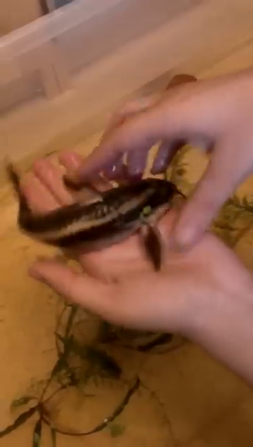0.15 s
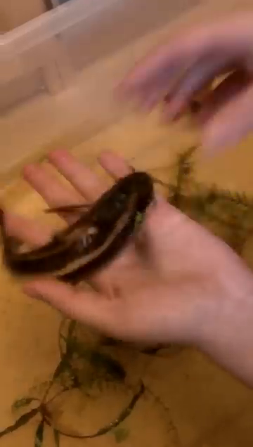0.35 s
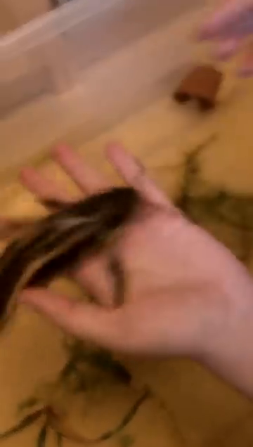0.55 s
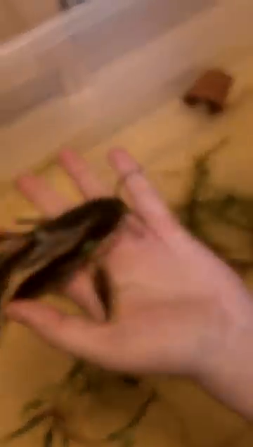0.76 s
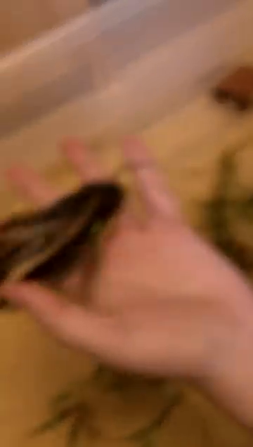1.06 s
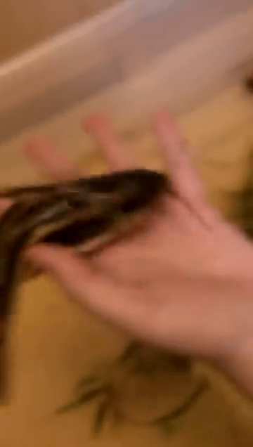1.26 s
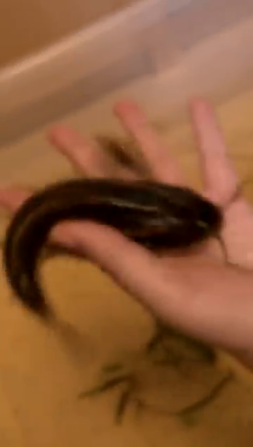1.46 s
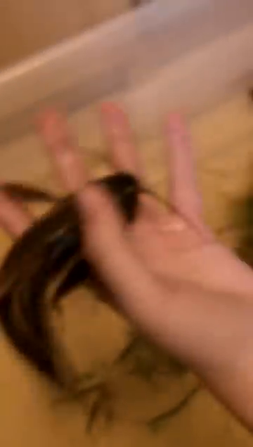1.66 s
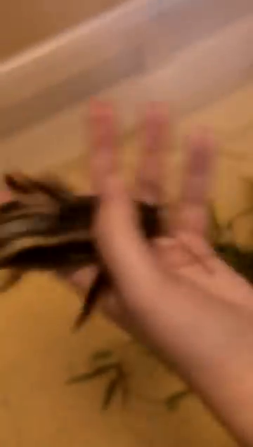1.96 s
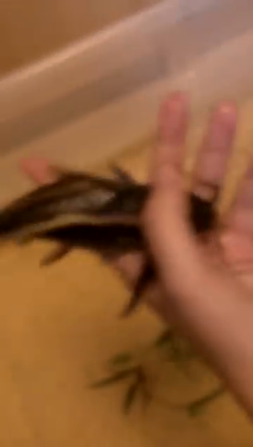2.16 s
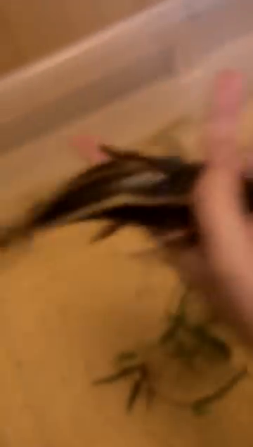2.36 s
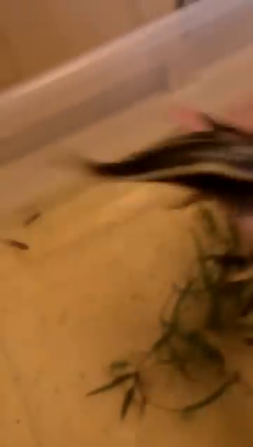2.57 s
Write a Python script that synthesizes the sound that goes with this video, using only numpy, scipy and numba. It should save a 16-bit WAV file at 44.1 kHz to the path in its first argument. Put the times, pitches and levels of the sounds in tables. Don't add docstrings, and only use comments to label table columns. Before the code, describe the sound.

After about 0.2 s of near silence, a held catfish rasps in short, ratchet-like croaks, each a rapid train of gritty clicks. Strong bursts come near 0.25, 0.4, 0.75, 1.0 and 1.25 s, with weaker scrapes between. From 1.35 s the croaks turn hollow and shifting in pitch, with a sharp crack near 1.65 s. More follow at 1.9, 2.05 and 2.35 s, then a faint scrape around 2.5 s. Close, small room, faint hiss.

```python
import sys
import numpy as np
from scipy import signal
from scipy.fft import rfft, irfft
from scipy.io import wavfile
from scipy.ndimage import uniform_filter1d
from numba import njit

SR = 44100
rng = np.random.default_rng(int(sys.argv[2]) if len(sys.argv) > 2 else 0)


def decibels_to_gain(level_db):
    exponent = np.asarray(level_db, float) / 20
    return 10 ** exponent


def wav_record(signal):
    frames = np.transpose(np.atleast_2d(signal))
    bounded = np.clip(frames, -1, 1)
    quanta = np.round(bounded * 32767).astype(np.int16)
    wavfile.write(sys.argv[1], SR, quanta)


N = 119070

# frequency_hz, level_db
HISS_SPECTRUM = [
    (30, -14),
    (100, -13.5),
    (350, 0.5),
    (800, -6.5),
    (1500, -10.5),
    (5000, -13.5),
    (7500, -11),
    (16000, -12.5),
]
HISS_DB, HISS_SWAY_DB = -69, -1.16

# start_s, level_db, pitch_hz
WET_TICKS = [(.2124, -60, 6200), (0.316, -52.5, 8050), (.9284, -49.5, 8000), (1.2371, -47.5, 6370),
             (1.8519, -53, 7000), (2.4657, -54, 7440), (2.618, -55, 5100), (2.671, -61, 7300),
             (1.694, -50.5, 6500), (1.75, -59, 9000), (2.309, -59, 5500), (2.569, -52.5, 8000)]
TICK_FALL_S, TICK_NOISE = 0.0011, 0.86

# start_s, level_db
RIDGE_SLIPS = [(0.2368, -24), (0.25, -19.5), (0.262, -18.5), (0.2652, -26), (0.2702, -20.5),
               (0.2753, -21.5), (0.28, -30), (0.2865, -37), (0.3837, -28.5), (0.396, -24), (0.4087, -22.5),
               (0.4227, -23.5), (0.4373, -23), (0.4479, -22), (0.4567, -24), (0.4627, -32.5), (0.4668, -39),
               (0.471, -47), (0.5138, -25.5), (0.532, -24.5), (0.5945, -40.5), (0.6002, -44.0),
               (0.6054, -38), (0.612, -37), (0.6317, -38), (0.723, -26), (0.7402, -23.5), (0.7551, -23),
               (0.7677, -25.0), (0.7791, -30.5), (0.7888, -41), (0.8207, -46.5), (0.8413, -30),
               (0.8524, -32.5), (0.893, -35.5), (0.9021, -41.5), (0.993, -24.5), (1.0091, -22.5),
               (1.0232, -19.5), (1.0372, -20.5), (1.0472, -22.5), (1.0561, -35.5), (1.062, -42),
               (1.0947, -43), (1.1, -39.5), (1.1118, -33.5), (1.1262, -30.5), (1.138, -36.5), (1.1521, -38),
               (1.175, -38),
               (1.2519, -26), (1.2674, -23.5), (1.2801, -23), (1.2945, -22), (1.3084, -22),
                (1.3185, -24.5), (1.3571, -33.5), (1.3701, -30.0), (1.38, -29), (1.3892, -26.5),
                (1.4007, -24.5), (1.4136, -23), (1.425, -22.5), (1.4339, -26.5), (1.4813, -32.5),
                (1.4956, -28), (1.5095, -27), (1.5231, -24.0), (1.5384, -24), (1.552, -23), (1.5623, -25.5),
                (1.569, -27.5), (1.5744, -30.5), (1.5806, -42.5), (1.6065, -30.0), (1.6183, -26),
                (1.6304, -27.5), (1.6483, -15), (1.6664, -24), (1.6757, -34.5), (1.7632, -45.5),
                (1.7743, -38.5), (1.7858, -35), (1.797, -36), (1.8063, -38.5),
               (1.8843, -33.5), (1.8938, -30.5), (1.9061, -29), (1.9179, -29), (1.9288, -23.5),
              (1.9361, -22.5), (1.9422, -23.5), (1.9491, -26.5), (1.956, -22.5), (1.964, -23.5),
              (1.9738, -24.0), (1.9845, -29.5), (2.0328, -29.5), (2.0435, -28), (2.0543, -26.5),
              (2.066, -24), (2.079, -25), (2.0948, -23.5), (2.1072, -24), (2.1155, -28), (2.1215, -37.5),
              (2.1627, -40.5), (2.1708, -39), (2.1762, -39), (2.1834, -39.5), (2.1926, -42.5),
              (2.202, -38.5), (2.2103, -40.0), (2.2215, -40), (2.233, -47), (2.33, -32.5), (2.3411, -30.5),
              (2.351, -28), (2.3624, -27), (2.3738, -28.5), (2.3885, -24.5), (2.3983, -26), (2.4059, -30.5),
              (2.4839, -46), (2.491, -40.5), (2.4964, -39.5), (2.5021, -40), (2.5102, -40.5),
              (2.5212, -37.0), (2.5294, -39), (2.5376, -42), (2.5472, -45.5), (2.5628, -47.5)]
SLIP_RISE_MS, SLIP_FALL_MS, SLIP_ROUGH = 0.73, 1.0, 0.61
GRIND_RISE_MS, GRIND_FALL_MS = 1.8, 9.17

# start_s, level_db
CREEP = [
    (.36, -61.5),
    (0.488, -61.5),
    (.805, -66),
    (0.867, -70),
    (1.333, -64.5),
    (1.456, -72),
    (1.742, -81),
    (2.005, -68),
    (2.142, -73),
    (2.467, -74),
]
CREEP_S = 0.031

# start_s, bladder_db, skull_db, edge_db, grinding_db
GRIP = [(.2, -19.5, -13.5, -1, -7), (.36, -8, -3.5, 6.5, -4.5), (0.489, -5, 1, 9, 0.5),
        (.58, -26, -16, 7.5, -1.5), (.7, -4.5, 0.5, 3, -5.5), (.81, 1, 2, 6, -6.5),
        (0.969, -2, -3, 1.5, -2.5), (1.085, 2, -1, 4.5, 0), (1.23, -2, 2, 3.5, -3),
        (1.345, -3, -9, 6.5, -7), (1.47, 2, -4, 4, -4), (1.6, -5, 0.5, 2, -3.5),
        (1.642, -18, -9.5, -4.5, -6), (1.75, -8.5, -18.5, 6.5, 2.5), (1.87, 1, -13, 2.5, -5.5),
        (1.926, -10.5, -28, 0, -7), (2.02, 4.5, -6.5, 3, -6), (2.15, -3, -7.5, 7.5, -6),
        (2.32, 4.5, -9, 6, -5.5), (2.475, 0.5, -9, 8, -3.5)]
# girdle_db, crisp_share (0-1)
SOCKET_FACE = [(-5, 0.48), (-4.5, 0.8), (2, 0.36), (-1.5, 0.9), (-1.5, 0.41), (2, 0.4), (-2, 0.69),
               (5.5, .75), (1.5, 0.4), (4, 0.2), (7, 0.4), (6, 0.7), (-4, 0), (0, 0.7), (2, 0.4),
               (1.5, 0.4), (3, 0.5), (5.5, 0.63), (5.5, 0.76), (8, 0.7)]
# chirp_db, chirp_hz, chirp_peak_ms, shaft_db, jaw_db
SPINE_TONE = [(0.5, 4780, 1.05, -1, -19.5), (-2, 5610, 0.87, -3, 1.5), (-3.5, 6000, 1.58, -4, -8),
              (-4, 4300, 1.27, 2, -9), (1, 5000, 1.8, -4.5, -18), (-2, 5250, 1.6, -7.5, -2.5),
              (0, 5170, 1.7, -9.5, -9), (-2, 4700, 2, -5.5, 2), (-1, 5300, 1.6, -7, -2.5),
              (0, 4700, 1.1, -3, 7), (1.5, 4370, 1.2, -6, 5.5), (4, 4460, 1.6, -6, 2.5),
              (3, 5400, 1.77, -7, -4), (3, 5650, 0.56, -4, -5.5), (-3, 5100, 1.2, -5, 8),
              (-1, 5470, 0.62, -4.5, -1), (-2, 5500, 1.17, -1.5, 11), (-7, 7300, 0.82, -2, 6.5),
              (-4.5, 5160, 1.22, -2.5, 12), (-9, 5500, 1.08, -3.5, 11)]
CHIRP_DB, CHIRP_FALL_HZ_PER_MS, CHIRP_SHARP, CHIRP_SCATTER = -6, 420, 2.74, 0.041

# frequency_hz, width_hz, level_db, lag_ms
SPINE = [
    (5150, 970, 3.5, .5),
    (6140, 670, -2, .3),
]
# frequency_hz, width_hz, level_db, lag_ms
BLADDER = [
    (306, 390, -28, 0.061),
    (699.4, 220, -6, 0.36),
]
# frequency_hz, width_hz, level_db, lag_ms
SKULL = [
    (1540, 238, -2.35, 1.483),
]
# frequency_hz, width_hz, level_db, lag_ms
GIRDLE = [
    (2199, 486, -3, 1.0644),
    (3250, 1320, 3.5, 1.187),
    (4300, 550, -1, 1.3),
]
# frequency_hz, width_hz, level_db, lag_ms
EDGE = [
    (7300, 6000, -7, .3),
    (9730, 1900, -24, .1),
    (15300, 7000, -30, 0.03),
]
# frequency_hz, width_hz, level_db, lag_ms
JAW = (1225.5, 299.5, -11.5, 0.45)
EDGE_CRISP, BONE_CRISP = .08, 0.56

# time_s, pitch_hz, level_db
HOLLOW = [(.25, 4360, -3.5), (.275, 4980, 4), (.3, 4700, 10), (.4, 2710, -6), (1.329, 2560, -4.5),
          (1.359, 3850, 12), (1.385, 3610, 11), (1.417, 3070, 13.5), (1.446, 3440, 5), (1.484, 4160, 16),
          (1.511, 2860, 14), (1.543, 2440, 15), (1.575, 2260, 11.5), (1.618, 2270, 4.5), (1.659, 3150, -20),
          (1.765, 3900, 11.5), (1.81, 4200, 8.5), (1.85, 4300, -5), (1.885, 4500, 11.5), (1.92, 4360, 8.5),
          (1.959, 4110, 10), (1.989, 3280, 7), (2.036, 3270, 14.5), (2.056, 3050, 5), (2.068, 2830, 10),
          (2.085, 2960, 5), (2.12, 3360, -18)]
HOLLOW_WIDTH_HZ, HOLLOW_DB, HOLLOW_LAG_MS = 245, -1, 1.913
HOLLOW_WIDE_HZ, HOLLOW_WIDE_DB, HOLLOW_WIDE_LAG_MS = 700, -6.5, 0.906
HOLLOW_DIP, HOLLOW_DIP_MS, HOLLOW_SCATTER, HOLLOW_GRIND = 0.097, 2.03, 0.014, 0.41
FISH_DB, FISH_LOW_HZ = 22, 200

BUBBLE_S, BUBBLE_LENGTH_S, BUBBLE_HZ, BUBBLE_DB = 1.795, .044, 658, -60.5
TUB_T60_S, TUB_DB, TUB_HZ, ROOM_T60_S, ROOM_DB = 0.073, -16, 4700, 0.35, -25
TOP_HZ = 16250


@njit
def svf(x, hz, width):
    y, band, low = np.empty(len(x)), 0., 0.
    for i in range(len(x)):
        g, k = np.tan(np.pi * hz[i] / SR), width / hz[i]
        v = (band + g * (x[i] - low)) / (1 + g * (g + k))
        band, low, y[i] = 2 * v - band, low + 2 * g * v, k * v
    return y


def ring(x, hz, width, db, lag_ms):
    hz = hz + np.zeros(N)
    y = svf(svf(x, hz, 1. * width), hz, 2. * width)
    return np.roll(y, int(lag_ms * SR / 1000)) * decibels_to_gain(db) * np.sqrt(SR / width)


def body(x, modes):
    return sum((-1) ** k * ring(x, *mode) for k, mode in enumerate(modes))


def shape(rise_ms, fall_ms):
    ms = np.arange(SR // 8) * 1000 / SR
    e = (1 - np.exp(-ms / rise_ms)) * np.exp(-ms / fall_ms)
    return e / np.sqrt(np.sum(e ** 2))


def conv(x, h):
    return signal.fftconvolve(x, h)[:N]


def hiss():
    f, pts = np.fft.rfftfreq(N, 1 / SR) + 1, np.array(HISS_SPECTRUM)
    gain = decibels_to_gain(np.interp(np.log(f), np.log(pts[:, 0]), pts[:, 1]))
    x = irfft(rfft(rng.standard_normal(N)) * gain, N)
    hold = SR // 15
    sway = np.repeat(rng.standard_normal(N // hold + 1), hold)
    sway = uniform_filter1d(sway, hold)[:N]
    return x / np.std(x) * decibels_to_gain(HISS_DB + HISS_SWAY_DB * sway)


def ticks():
    out, t = np.zeros(N + SR), np.arange(SR // 200) / SR
    for start_s, db, hz in WET_TICKS:
        k = int(start_s * SR)
        snap = np.sin(2 * np.pi * hz * t) + TICK_NOISE * rng.standard_normal(len(t))
        out[k:k + len(t)] += decibels_to_gain(db) * np.exp(-t / TICK_FALL_S) * snap
    return out[:N]


def slips():
    x, rows = np.zeros(N), np.array(RIDGE_SLIPS)
    x[(rows[:, 0] * SR).astype(int)] = decibels_to_gain(rows[:, 1])
    return x


def grinding(clicks, level):
    t = np.arange(N) / SR
    creep = sum(decibels_to_gain(db) * np.sin(np.pi * np.clip((t - s) / CREEP_S, 0, 1) ** 2) for s, db in CREEP)
    rub = np.abs(conv(clicks, shape(GRIND_RISE_MS, GRIND_FALL_MS)))
    return (rub * level + creep) * rng.laplace(size=N) / 2


def chirps(clicks, stroke):
    at, ms, out = np.flatnonzero(clicks), np.arange(SR // 100) * 1000 / SR, np.zeros(N + SR)
    db, hz, peak_ms = np.array(SPINE_TONE)[stroke[at], :3].T[:, :, None]
    pitch_luck, phase = rng.standard_normal((len(at), 2)).T[:, :, None]
    swell = (ms / peak_ms * np.exp(1 - ms / peak_ms)) ** CHIRP_SHARP
    pitch = hz * (1 + CHIRP_SCATTER * pitch_luck) - CHIRP_FALL_HZ_PER_MS * (ms - peak_ms)
    pitch = np.clip(pitch, hz / 2, None)
    tone = swell * np.sin(2 * np.pi * np.cumsum(pitch, axis=1) / SR + phase) / np.sqrt(peak_ms)
    np.add.at(out, at[:, None] + np.arange(len(ms)), clicks[at, None] * decibels_to_gain(db + CHIRP_DB) * tone)
    return out[:N]


def hand_hollow(clicks, fresh, grind):
    t, (at_s, at_hz, at_db) = np.arange(N) / SR, np.array(HOLLOW).T
    blow = (clicks + .5 * fresh + HOLLOW_GRIND * grind) * decibels_to_gain(np.interp(t, at_s, at_db))
    twitch = rng.standard_normal(N // 100)[np.cumsum(clicks > 0)]
    since_ms = (t - np.maximum.accumulate(t * (clicks > 0))) * 1000
    dip = HOLLOW_DIP * np.exp(-since_ms / HOLLOW_DIP_MS)
    hz = np.interp(t, at_s, at_hz) * (1 + HOLLOW_SCATTER * twitch - dip)
    narrow = ring(blow, hz, HOLLOW_WIDTH_HZ, HOLLOW_DB, HOLLOW_LAG_MS)
    return narrow + ring(blow, hz, HOLLOW_WIDE_HZ, HOLLOW_WIDE_DB, HOLLOW_WIDE_LAG_MS)


def fish():
    t, clicks, grip = np.arange(N) / SR, slips(), np.array(GRIP)
    stroke = np.clip(np.searchsorted(grip[:, 0], t) - 1, 0, None)
    bladder, skull, edge, rubbing = decibels_to_gain(grip[stroke, 1:].T)
    girdle_db, crisp = np.array(SOCKET_FACE)[stroke].T
    shaft, jaw = decibels_to_gain(np.array(SPINE_TONE)[stroke, 3:].T)

    burst = shape(SLIP_RISE_MS, SLIP_FALL_MS)
    same = conv(clicks, burst * np.sign(rng.standard_normal(len(burst))))
    fresh = conv(clicks, burst) * rng.standard_normal(N)
    grind = grinding(clicks, rubbing)
    crisp = np.clip(crisp, 0, 1)
    rough = (1 - SLIP_ROUGH) * same + SLIP_ROUGH * fresh
    push = crisp * clicks + np.sqrt(1 - crisp ** 2) * rough + grind
    knock = push + BONE_CRISP * clicks

    out = chirps(clicks, stroke) + body(push * shaft, SPINE)
    out += body(knock * bladder, BLADDER) + body(knock * skull, SKULL)
    out -= body(push * decibels_to_gain(girdle_db), GIRDLE)
    out += body((push + EDGE_CRISP * clicks) * edge, EDGE)
    out += hand_hollow(clicks, fresh, grind)
    out -= ring(push * jaw, *JAW)
    return signal.lfilter(*signal.butter(1, FISH_LOW_HZ, "high", fs=SR), out) * decibels_to_gain(FISH_DB) / 10


def bubble():
    t = np.arange(N) / SR - BUBBLE_S
    swell = np.sin(np.pi * np.clip(t / BUBBLE_LENGTH_S, 0, 1)) ** .5
    return decibels_to_gain(BUBBLE_DB) * swell * np.sin(2 * np.pi * BUBBLE_HZ * t)


def echo(x, t60, hz, width):
    t = np.arange(SR // 2) / SR
    tail = svf(rng.standard_normal(len(t)), hz + 0 * t, 1. * width)
    tail = tail * np.exp(-np.log(1000) * t / t60) * (t > .003)
    return conv(x, tail / np.sqrt(np.sum(tail ** 2)))


def scene():
    near = fish() + ticks() + bubble()
    tub = decibels_to_gain(TUB_DB) * echo(near, TUB_T60_S, TUB_HZ, 9100)
    room = decibels_to_gain(ROOM_DB) * echo(near, ROOM_T60_S, 1700, 5000)
    return (near + tub + room + hiss())[None]


def top_cut(x):
    return signal.sosfilt(signal.butter(12, 16440, fs=SR, output="sos"), x)


def record(dry):
    x = signal.sosfilt(signal.ellip(8, .2, 70, TOP_HZ, fs=SR, output="sos"), dry)
    return top_cut(x)


dry = scene()
out = record(dry)
wav_record(out)
```